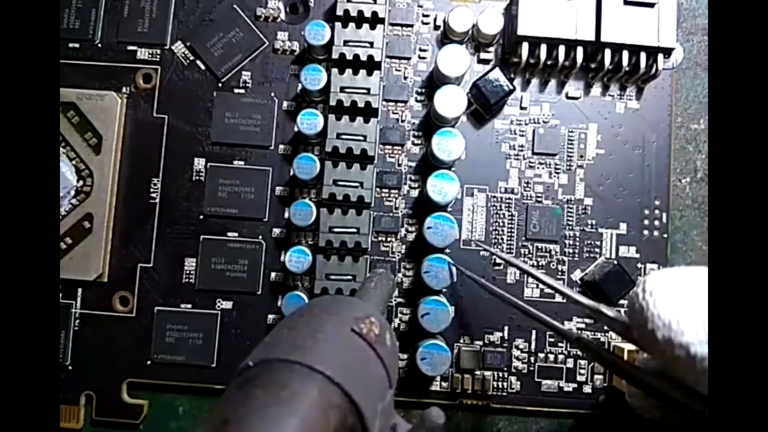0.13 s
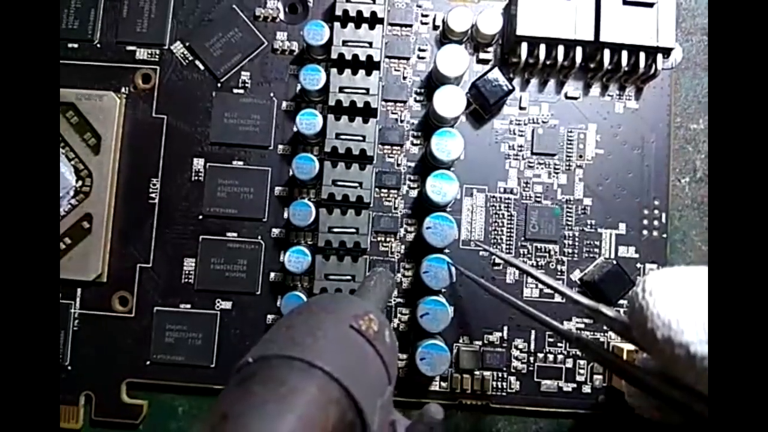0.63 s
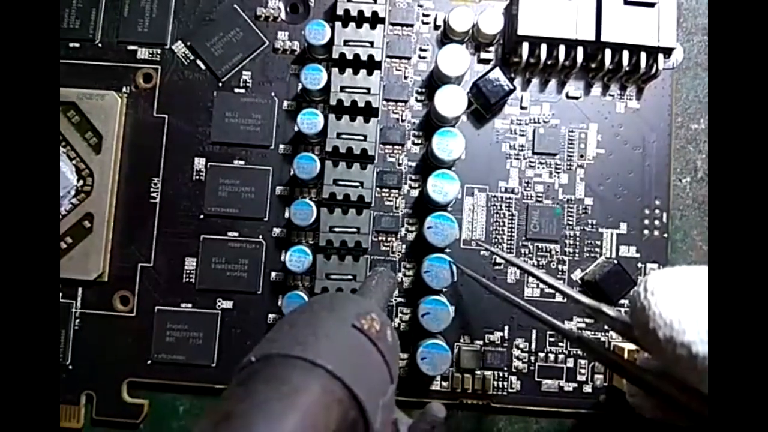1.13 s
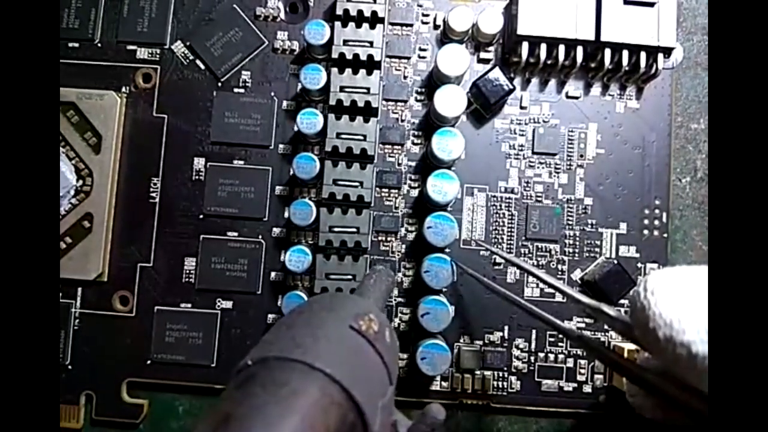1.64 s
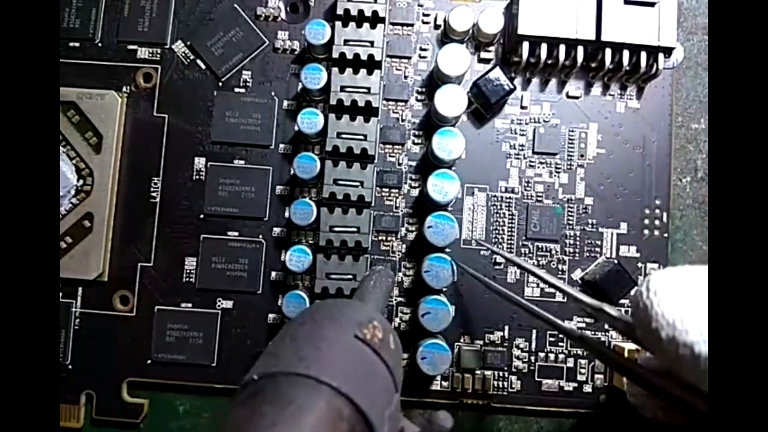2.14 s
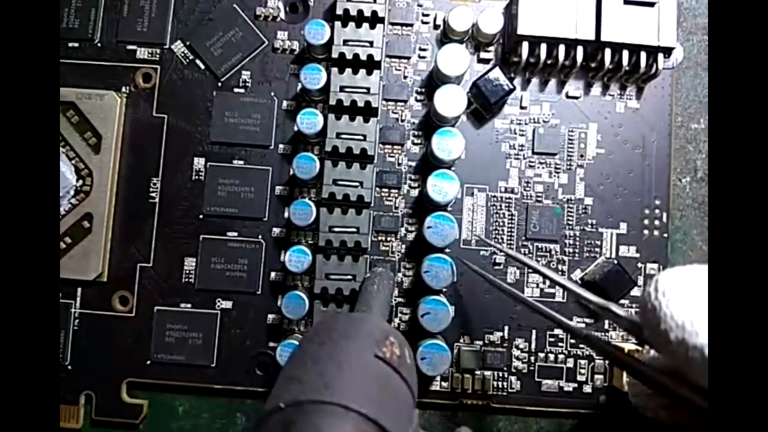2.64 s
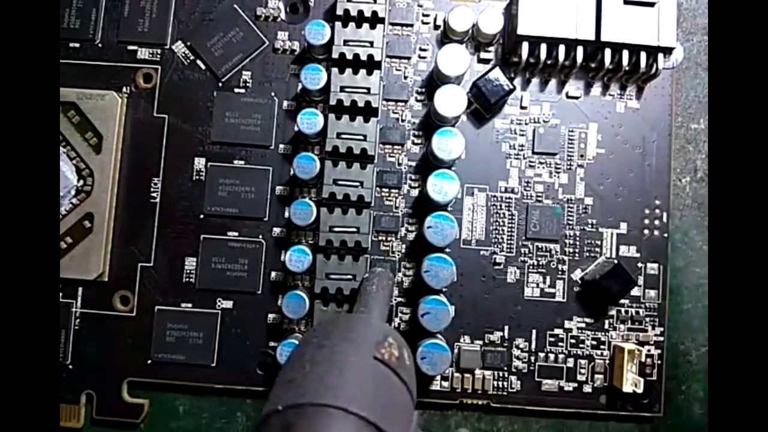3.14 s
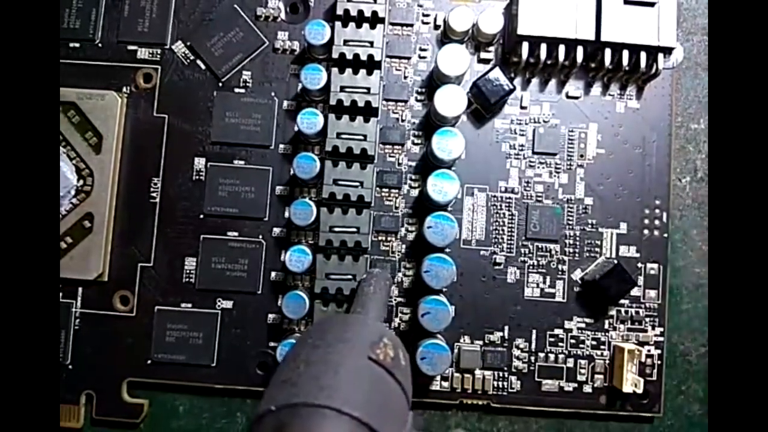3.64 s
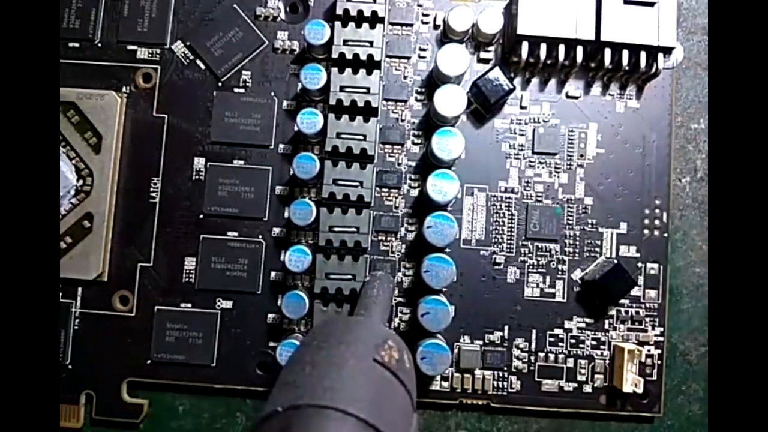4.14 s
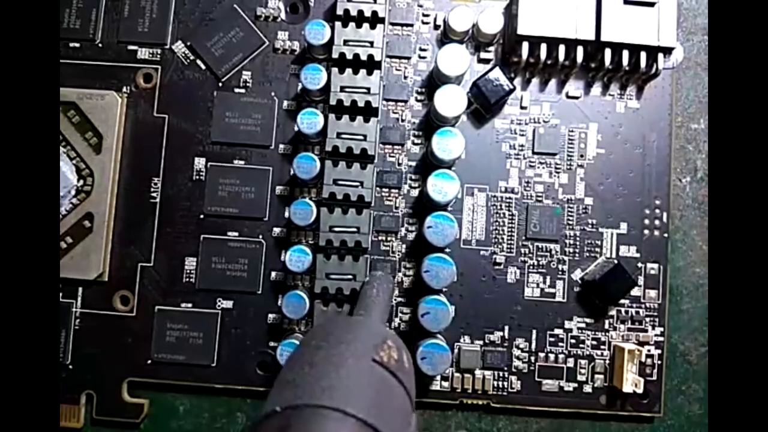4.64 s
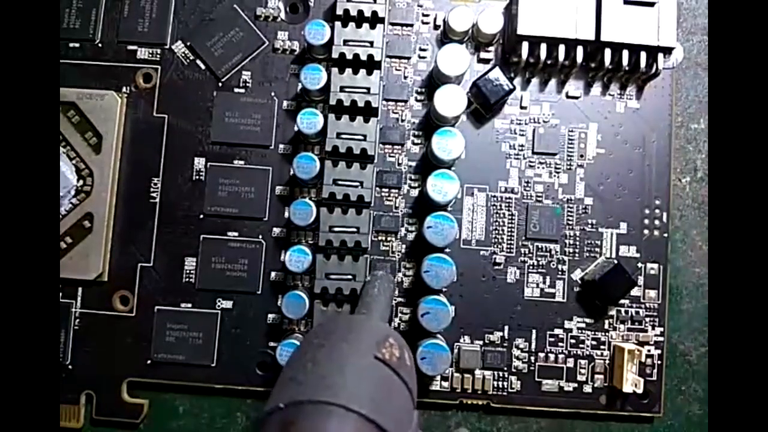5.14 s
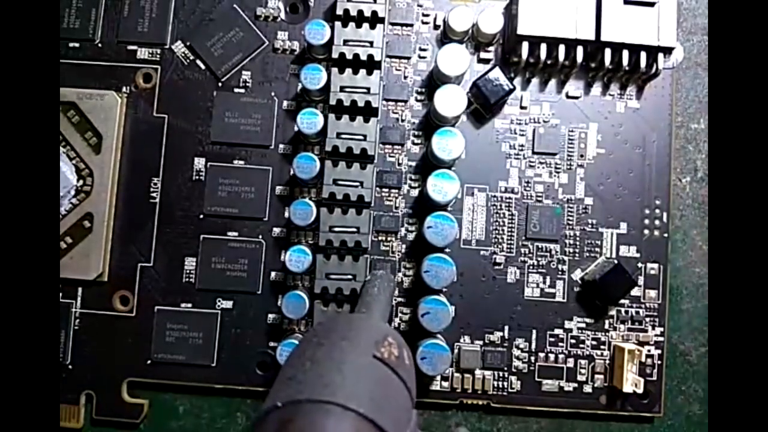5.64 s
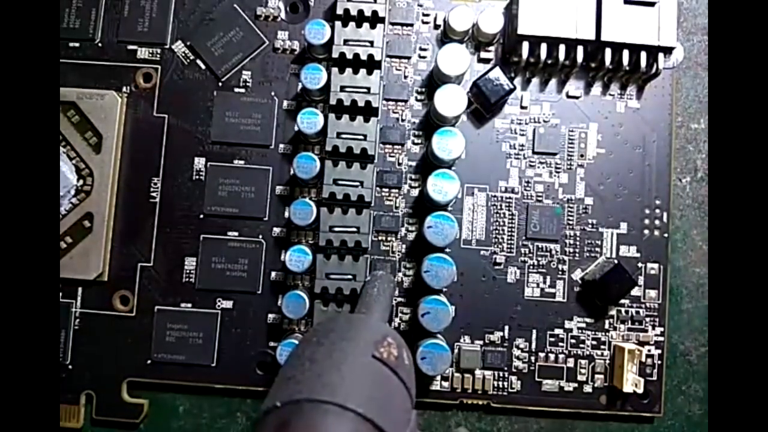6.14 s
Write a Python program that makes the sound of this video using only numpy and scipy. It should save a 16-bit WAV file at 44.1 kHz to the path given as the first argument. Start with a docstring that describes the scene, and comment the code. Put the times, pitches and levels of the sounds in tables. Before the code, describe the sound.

Close stereo microphones at a small, nearly dry workbench catch quiet rushing air and a low buzzing pump hum beneath. Midway, thin metal tweezers tick once, then land and rattle loudly on the hard bench, pinging high and dragging briefly, pausing, and rattling again. The tweezers are brighter on the left. Afterwards only the fluttering hiss and hum carry on.

```python
"""Hot air tool and tweezers at a bench

A hot air tool blows over a circuit board: filtered noise, throbbing twice per mains cycle with its pump.
The diaphragm pump hums on mains harmonics over a casing buzz; a screen whines faintly.
Steel tweezers tick, are dropped on the bench, clatter and are dragged: noise bursts, grains, ringing modes.
Of two close microphones, the left gets the jet a little later and brighter, but the tweezers first."""
import sys
import numpy as np
from scipy import signal
from scipy.fft import rfft, irfft
from scipy.io import wavfile
from scipy.ndimage import map_coordinates

SR = 44100
rng = np.random.default_rng(int(sys.argv[2]) if len(sys.argv) > 2 else 0)


def persist_wave(psi):
    """Save psi, clipped to +-1, as 16-bit WAV."""
    counts = np.round(np.clip(psi, -1, 1) * 32767).astype(np.int16)
    wavfile.write(sys.argv[1], SR, np.atleast_2d(counts).T)


def boost_factor(decibels):
    """Convert a level in decibels to a linear amplitude factor."""
    exponent = np.asarray(decibels, float) / 20
    return 10 ** exponent


N = 276507   # length in samples
MAINS_HZ = 50.25


def at_hz(table, hz):
    """Columns of a spectrum table read on a log-frequency axis."""
    table_hz, *columns = np.transpose(table)
    return np.array([np.interp(np.log(hz + 1), np.log(table_hz), column) for column in columns])


def rms_one(x):
    """Scale to unit rms."""
    return x / np.sqrt(np.mean(x ** 2) + 1e-20)


def drift(rate_hz):
    """Slow smooth chance with unit rms, from rate_hz random points per second."""
    steps = int(N / SR * rate_hz) + 3
    points = rng.standard_normal(steps)
    return rms_one(map_coordinates(points, [np.arange(N) / SR * rate_hz], order=3))


def ring(clicks, hz, t60_s):
    """A resonance: a unit click sets a sine of height 1 ringing, 60 dB down after t60_s."""
    r = boost_factor(-60 / (t60_s * SR))
    w = 2 * np.pi * hz / SR
    return signal.lfilter([0, np.sin(w)], [1, -2 * r * np.cos(w), r * r], clicks + 1e-18)


def band(x, low_hz, high_hz):
    """Gentle band-pass."""
    return signal.sosfilt(signal.butter(2, [low_hz, high_hz], "band", fs=SR, output="sos"), x)


def late(x, lag_s):
    """Delay by a fraction of a millisecond, as a longer path through air does."""
    turn = np.exp(-2j * np.pi * np.fft.rfftfreq(N, 1 / SR) * lag_s)
    return irfft(rfft(x) * turn, N)


def two_mic_noise(share, common, own):
    """Mix noise common to both microphones with each one's own, at constant power."""
    return np.sqrt(share) * common + np.sqrt(1 - share) * np.array(own)


# level of the screen whine at each microphone: left, right [dB rms]
WHINE_LEVEL_DB = [-57, -69]


def whine(whine_hz=15625):
    """Line-scan whistle of a screen, a wavering sine opposite in phase at the two microphones."""
    tone = np.sin(2 * np.pi * whine_hz * np.arange(N) / SR) * boost_factor(1.5 * drift(5.3))
    return np.sqrt(2) * boost_factor(np.c_[WHINE_LEVEL_DB]) * tone * [[1], [-1]]


# narrow bands that echoes from board and bench weaken or strengthen:
# centre_hz [Hz], width_hz [Hz], left_db [dB], right_db [dB]
ECHO_DIPS = [(448, 78, -3.5, -19), (1197, 123, -3.5, -11.5), (1864, 270, 3.5, 2), (3210, 1510, -7, -4.5),
             (4540, 720, -8, -4), (5910, 690, -11, -0.5), (6670, 280, -2.5, -11), (7270, 400, -14, 0),
             (9463, 400, 1, 23), (10600, 750, 0.4, -22)]
# share of the noise power common to both microphones: pitch_hz [Hz], share [0-1]
SHARED_NOISE = [(200, .95), (700, .85), (1200, .45), (2200, .65), (2950, .55), (3200, .9), (3650, .88),
                (3900, .45), (8000, .6), (9600, .45), (9850, .85), (10400, .75), (10800, .3), (13000, .08)]


def stereo_noise(colour, left_lag_s=0.00014):
    """Noise partly common to both microphones, later at the left, coloured and notched by echoes; rms 1."""
    hz = np.fft.rfftfreq(N, 1 / SR)
    common, *own = rfft(rng.standard_normal((3, N)))
    # the common part travels about 5 cm further to the left microphone
    common = common * np.exp(-2j * np.pi * hz * np.array([[left_lag_s], [0]]))
    shape_db = at_hz(colour, hz)
    for centre_hz, width_hz, *depth_db in ECHO_DIPS:
        shape_db += np.outer(depth_db, 1 / (1 + (2 * (hz - centre_hz) / width_hz) ** 4))
    return rms_one(irfft(boost_factor(shape_db) * two_mic_noise(at_hz(SHARED_NOISE, hz), common, own), N))


# pump hum at the two microphones:
# mains_multiple [1], left_db [dB rms], right_db [dB rms], phase_rad [rad]
HUM_LINES = [(2, -70, -67, 4.7), (4, -51, -47, 1.43), (5, -84, -68, 2.6), (6, -57.5, -55.5, 0.09),
             (8, -79, -80, 3.9), (9, -77.5, -77.5, 2.8), (10, -92, -91, 0.41)]
# colour of the pump casing and bench buzz: pitch_hz [Hz], left_db [relative dB per Hz], right_db [same]
CASING_COLOUR = [(30, -41, -41), (70, -33, -32), (137, -22, 0), (161, 0.5, 1.5), (248, 4.5, 4.5),
                 (340, 1.5, 9.5), (623, -11.5, 3), (757, 6.5, 11), (860, -0.5, 2), (1480, -2, -3),
                 (2480, -9, -27)]


def pump(mains_phase, waver_db=0.67, uneven=0.095, casing_db=-52.5):
    """Hum lines that waver slightly, over a casing buzz; alternate strokes differ."""
    hum = 0
    for multiple, left_db, right_db, phase_rad in HUM_LINES:
        # higher lines waver more
        level_db = [[left_db], [right_db]] + waver_db * np.sqrt(multiple / 4) * drift(6)
        hum = hum + np.sqrt(2) * boost_factor(level_db) * np.cos(multiple * mains_phase + phase_rad)
    beat = 1 + uneven * (np.cos(mains_phase) + np.cos(2 * mains_phase))
    return hum + boost_factor(casing_db) * beat * stereo_noise(CASING_COLOUR)


# air jet as the nozzle moves:
# start_s [s], level_db [dB], left_minus_right_db [dB], airy_db [dB gain of the airy band]
JET_MOVES = [(0.0, -45.5, -1.5, -11), (0.61, -46, -1, -27), (1.51, -44.5, -0.5, -15.5), (2.09, -43, -1, -4),
             (2.22, -42.5, -4, 9), (2.34, -44, -1.5, -8), (3.4, -42, 0.7, 2), (4.5, -41.5, 0, 1.5),
             (5.0, -41.5, 1.1, 5), (6.27, -41, 0, 8)]
# jet colour at the two microphones: pitch_hz [Hz], left_db [relative dB per Hz], right_db [same]
JET_SPECTRUM = [(258, -15, -55), (602, -0.5, 0.5), (1410, -5, 1.5), (1980, 0.1, -0.75), (3280, 3.5, 7),
                (5350, 4, 1), (7650, -0.5, 4), (8490, -0.8, -1), (9570, -9, -23), (11850, 1.5, -13),
                (12400, -1.5, -17), (12800, -16, -22), (13400, -5.5, -27), (15700, -46, -10)]
# depth of the throb at each pump stroke: pitch_hz [Hz], depth [0-1]
THROB_DEPTH = [(500, 0.22), (1500, 0), (3000, 0.04), (6000, 0.4), (10000, 0.28)]


def jet(mains_phase, throb_phase_rad=0.34, patchy_db=0.68, gust_db=0.84, airy_hz=10100, airy_width_hz=730):
    """Hiss in octave bands; every pump stroke swells it, by band; the bands flicker a little."""
    start_s, level_db, left_minus_right_db, airy_db = np.transpose(JET_MOVES)
    t, hz = np.arange(N) / SR, np.fft.rfftfreq(N, 1 / SR)
    air = rfft(stereo_noise(JET_SPECTRUM))
    gust = drift(9.5)
    hiss = 0
    centres_hz = 250 * 2.0 ** np.arange(7)
    for centre_hz in centres_hz:
        octaves_off = np.log2(np.clip(hz, centres_hz[0], centres_hz[-1]) / centre_hz)
        share = np.clip(1 - abs(octaves_off), 0, 1)
        swell = 1 + at_hz(THROB_DEPTH, centre_hz) * np.cos(2 * mains_phase + throb_phase_rad)
        flicker = boost_factor(patchy_db * drift(13) + gust_db * gust)
        hiss = hiss + irfft(air * share, N) * swell * flicker
    # the airy band rises and falls as the nozzle moves
    airy = irfft(rfft(hiss) / (1 + (2 * (hz - airy_hz) / airy_width_hz) ** 4), N)
    hiss = hiss + (boost_factor(np.interp(t, start_s, airy_db)) - 1) * airy
    pan_db = np.interp(t, start_s, left_minus_right_db) * [[0.5], [-0.5]]
    return hiss * boost_factor(np.interp(t, start_s, level_db) + pan_db)


def bursts(at, level_db, t60_s, alike):
    """Noise bursts with a sudden start and exponential decay, partly unlike at the two microphones."""
    clicks = np.zeros(N)
    clicks[at] = boost_factor(level_db)
    common, *own = rng.standard_normal((3, N))
    decay = signal.lfilter([1], [1, -boost_factor(-60 / (t60_s * SR))], clicks + 1e-18)
    return decay * two_mic_noise(alike, common, own)


# tweezers dragging and rattling:
# start_s [s], length_s [s], start_db [dB], end_db [dB]
DRAGS = [(3.657, 0.11, -26.5, -34), (3.968, 0.039, -25, -38), (4.016, 0.088, -38, -30),
         (4.119, 0.045, -28.5, -26.5)]


def drag_pressure(attack_s=0.0022, release_db_per_s=300):
    """Each drag sets in quickly, swells or sags along its length and dies away."""
    t = np.arange(N) / SR
    pressure = 0
    for start_s, length_s, start_db, end_db in DRAGS:
        end_s = start_s + length_s
        level_db = np.interp(t, [start_s, end_s], [start_db, end_db])
        level_db = level_db - release_db_per_s * np.maximum(t - end_s, 0)
        pressure = pressure + np.clip((t - start_s) / attack_s, 0, 1) * boost_factor(level_db)
    return pressure


def drag_grains(grains_per_s=3000.0, size_db=3.5):
    """Dense random clicks of uneven size as the tips drag, following the drag pressure."""
    present = rng.random((2, N)) < grains_per_s / SR
    size = boost_factor(size_db * rng.exponential(1, (2, N)))
    grains = present * size * rng.choice([-1, 1], (2, N))
    # one set of grains reaches both microphones
    return drag_pressure() * boost_factor(1.64 * drift(90)) * rms_one(grains + grains[0])


# tweezers left free to ring:
# start_s [s], free_s [s], blow_db [dB], favoured_hz [Hz, pitch the blow feeds most]
FREE_RINGS = [(3.471, .09, -55, 13520), (3.565, 0.19, -19.5, 13520), (3.658, 0.15, -42, 13520),
              (3.694, .015, -21.5, 10600), (3.971, 0.0054, -34, 12078), (4.021, .025, -38, 13400),
              (4.049, .05, -15.5, 11600), (4.075, .1, -50, 13500), (4.138, .006, -45, 12078)]
# pitches of the long steel modes: pitch_hz [Hz]
STEEL_PITCH_HZ = [13520, 12078, 10295, 10825, 7300, 3950]
# the same modes, in the same order: t60_s [s, free decay], left_db [dB], right_db [dB]
STEEL_MODES = [(0.51, 14, -12), (0.1, 17, -18), (0.52, -2, 5), (0.034, 17.5, -13), (.25, 12, 10),
               (0.32, 9, 10)]


def steel_rings(damped_t60_s=0.039, off_pitch_db_per_khz=18, off_pitch_most_db=30):
    """Long modes ring freely until held or landing again; a blow feeds those near its pitch most."""
    out = np.zeros((2, N))
    t = np.arange(SR // 2) / SR
    for start_s, free_s, blow_db, favoured_hz in FREE_RINGS:
        start = round(start_s * SR)
        # damping adds to each mode's own decay once the free time is over
        damping_db = -60 * np.maximum(t - free_s, 0) / damped_t60_s
        for hz, (t60_s, left_db, right_db) in zip(STEEL_PITCH_HZ, STEEL_MODES):
            off_pitch_db = min(off_pitch_db_per_khz * abs(hz - favoured_hz) / 1e3, off_pitch_most_db)
            level_db = blow_db - off_pitch_db - 60 * t / t60_s + damping_db
            mode = boost_factor(level_db + [[left_db], [right_db]]) * np.sin(2 * np.pi * hz * t)
            out[:, start:start + len(t)] += mode
    return out


# tweezer contacts:
# start_s [s], crack_db [dB], knock_db [dB, bench], thump_db [dB, bench]
TWEEZER_CONTACTS = [(2.9283, -25, -53, -50), (3.4728, -22, -73, -17.5), (3.5651, -8, -35.5, -34),
                    (3.6585, -10.5, -33.5, -36), (3.6733, -20, -41, -27), (3.6834, -9, -39, -19),
                    (3.6930, -15.5, -38, -24), (3.7226, -17, -31, -15.5), (3.7398, -34, -35, -23),
                    (3.748, -17.5, -43, -29), (3.9548, -31, -44, -22.5), (3.96, -21, -47, -35),
                    (3.9696, -22, -42.5, -23), (4.0212, -13.5, -51, -18), (4.0420, -9, -36.5, -39),
                    (4.0467, -11, -35, -37), (4.0655, -22, -39.5, -30), (4.087, -16, -44, -34),
                    (4.119, -24, -47, -23.5), (4.137, -18, -51, -33), (4.151, -15.5, -46, -31),
                    (4.1643, -22, -57, -32)]
# weaker steel modes, struck with the crack: pitch_hz [Hz], t60_s [s], level_db [relative dB]
TINE_MODES = [(7900, 0.041, -7.5), (8300, 0.021, -4), (15500, .012, -26)]
# bench and board modes under a knock: pitch_hz [Hz], t60_s [s], level_db [relative dB]
BENCH_MODES = [(776, 0.034, -12), (1312, 0.009, 4), (1880, 0.0024, 7.5), (2580, 0.0098, -1.4),
               (3070, 0.015, -8.5), (3336, 0.014, -3.5), (4164, 0.0086, 1), (5240, 0.0084, -4.5)]


def tweezers(tick_db=5, bench_lead_s=0.000297):
    """Cracks of steel, knocks and thumps into the bench, grains while the tips drag, and long rings."""
    start_s, crack_db, knock_db, thump_db = np.transpose(TWEEZER_CONTACTS)
    at = np.round(start_s * SR).astype(int)
    rub = drag_grains()
    blows = bursts(at, knock_db, 0.022, alike=0.51)
    blows = blows + bursts(at, knock_db + tick_db, 0.0018, alike=0.99) + rub * boost_factor(-18.5)
    knocks = 0
    for k, (hz, t60_s, level_db) in enumerate(BENCH_MODES):
        # each contact lands elsewhere, so the share of each mode keeps changing
        struck = blows * boost_factor(1.9 * drift(45))
        knocks = knocks + boost_factor(level_db) * ring(struck, hz, t60_s) * (-1) ** k
    thumps = band(bursts(at, thump_db, 0.048, alike=0.48) + rub * boost_factor(-4), 200, 1270)
    crack = band(bursts(at, crack_db, 0.035, alike=0.074) + rub, 7140, 14300)
    # the first touch is a thin tick
    crack = crack + band(bursts(at, crack_db + tick_db, 0.001, alike=0.69), 2100, 22000)
    tines = sum(ring(crack * boost_factor(level_db - 30.5), hz, t60_s) for hz, t60_s, level_db in TINE_MODES)
    left, right = band(knocks, 180, 17000) + thumps + crack + tines
    # the right microphone is turned away, about 10 cm further: later, duller, but closer to the bench top
    right = band(band(right, 34, 10500), 27, 10500)
    right = boost_factor(1.5) * late(right, bench_lead_s)
    return np.array([left, right]) + steel_rings()


def bench_echoes(x, level_db=-13, t60_s=0.22):
    """A short diffuse tail from the things on the bench, different at each microphone."""
    t = np.arange(SR // 4) / SR
    tail = rng.standard_normal((2, len(t))) * boost_factor(-60 * t / t60_s) * (t > 0.0015)
    tail = tail / np.sqrt(np.sum(tail ** 2, axis=1, keepdims=True))
    return boost_factor(level_db) * signal.fftconvolve(x, tail, axes=1)[:, :N]


def limiter(x, threshold_db=-12.5, share=0.39, attack_s=0.0021, release_db_per_s=103, top=0.55):
    """Loud peaks pull the gain of both channels down; it recovers at a steady rate."""
    climb_db = release_db_per_s * np.arange(N) / SR
    over_db = np.maximum(20 * np.log10(abs(x).max(axis=0) + 1e-9) - threshold_db, 0)
    held_db = np.maximum.accumulate(over_db + climb_db) - climb_db
    r = np.exp(-1 / (attack_s * SR))
    x = x * boost_factor(-share * signal.lfilter([1 - r], [1, -r], held_db))
    # what slips past is rounded off
    return top * np.tanh(x / top)


def scene():
    """Jet, pump, whine and tweezers with their echoes, at the two microphones."""
    mains_phase = 2 * np.pi * MAINS_HZ * np.arange(N) / SR
    tool = tweezers()
    return whine() + pump(mains_phase) + jet(mains_phase) + tool + bench_echoes(tool)


def band_limit(x):
    """A steep low-pass at the top of the band."""
    return signal.sosfilt(signal.butter(12, 15950, fs=SR, output="sos"), x)


def record(dry):
    """Peaks are limited, then a steep low-pass cuts the top above 15.8 kHz."""
    low_pass = signal.ellip(12, 0.5, 50, 15800, fs=SR, output="sos")
    mix = signal.sosfilt(low_pass, limiter(dry))
    return band_limit(mix)


dry = scene()
out = record(dry)
persist_wave(out)
```